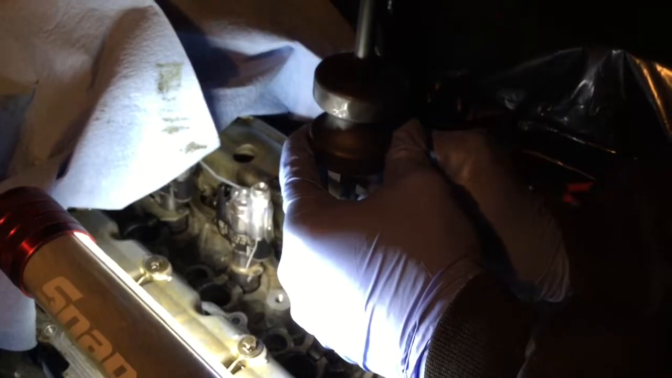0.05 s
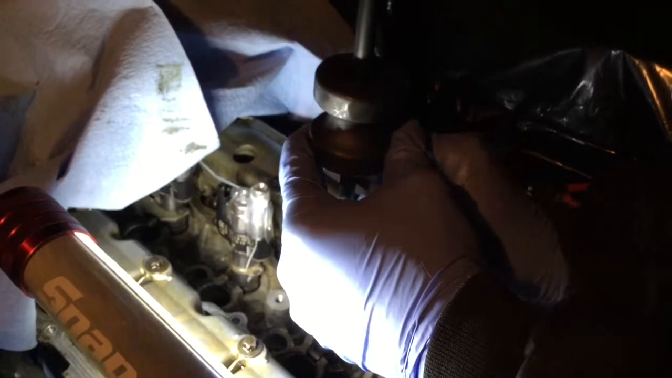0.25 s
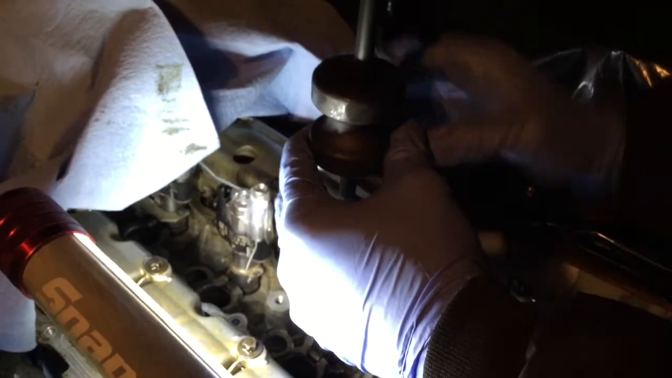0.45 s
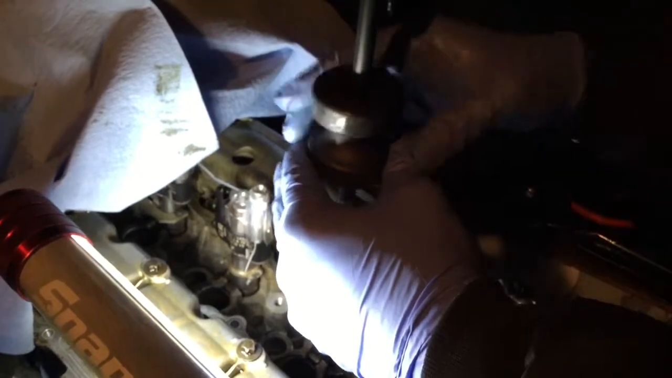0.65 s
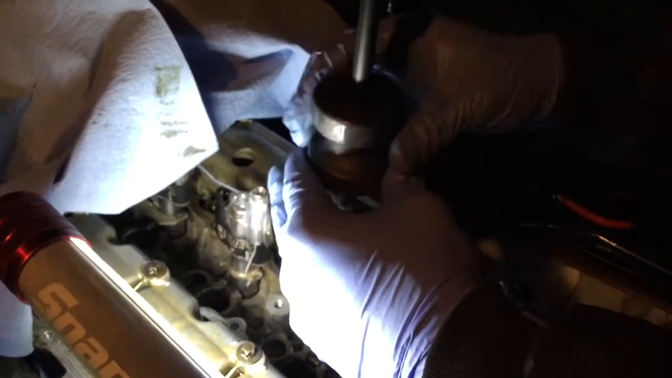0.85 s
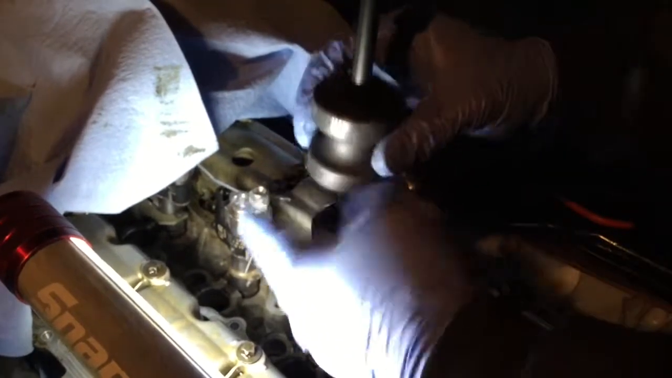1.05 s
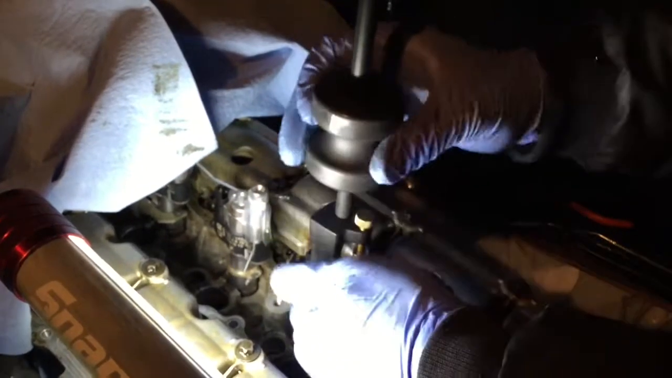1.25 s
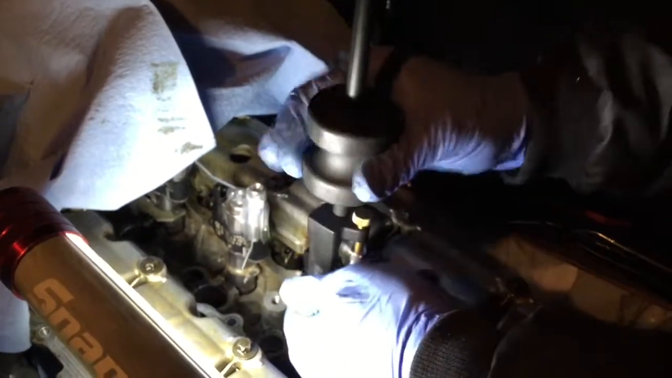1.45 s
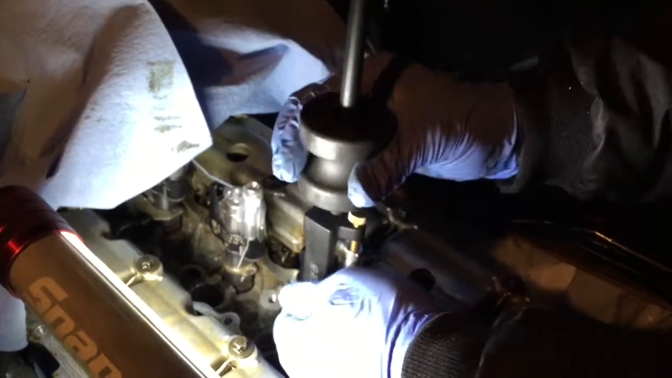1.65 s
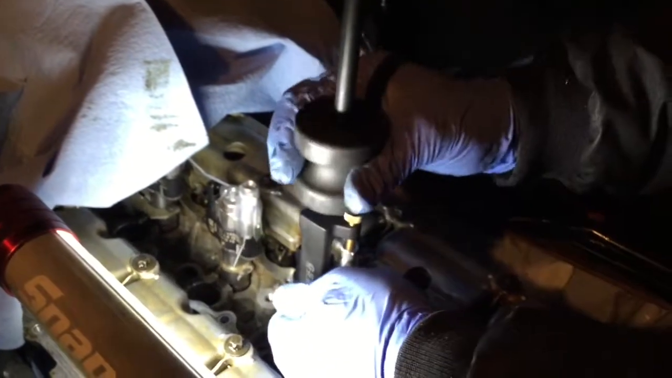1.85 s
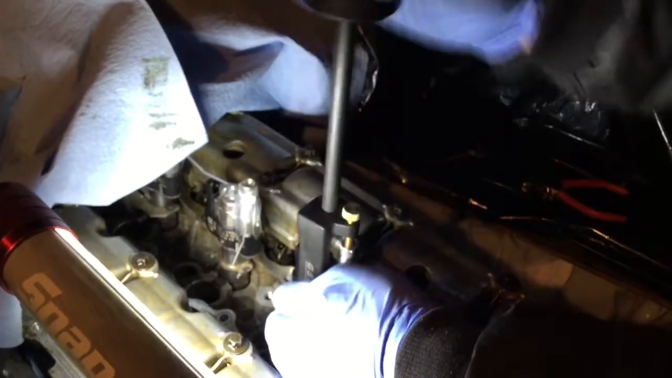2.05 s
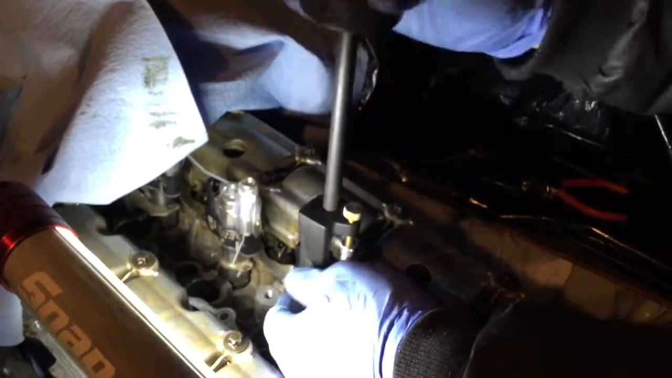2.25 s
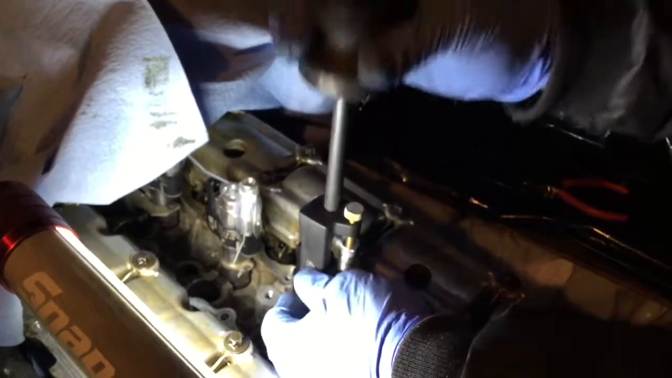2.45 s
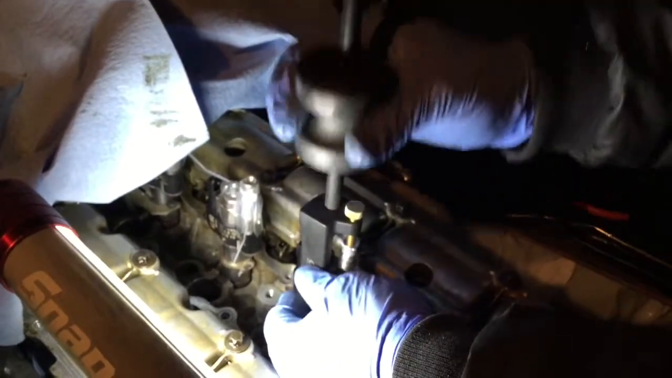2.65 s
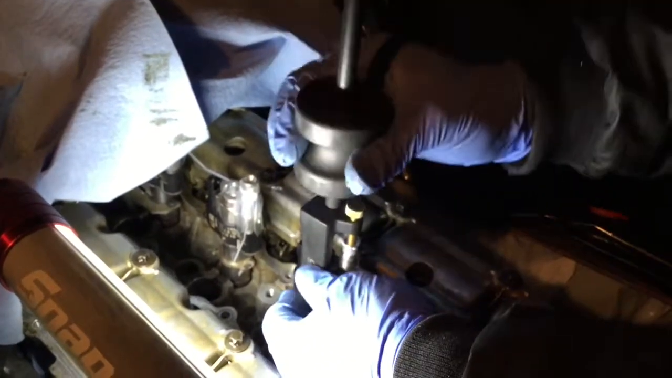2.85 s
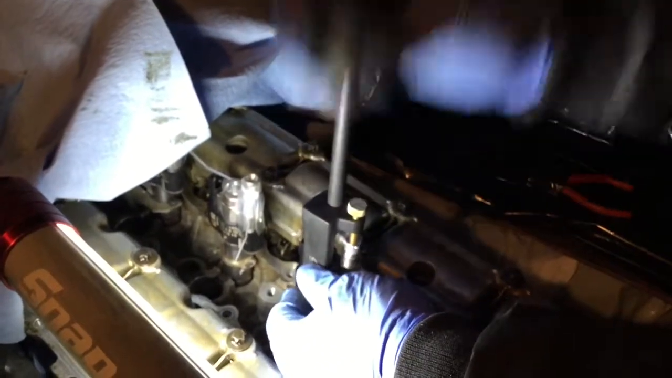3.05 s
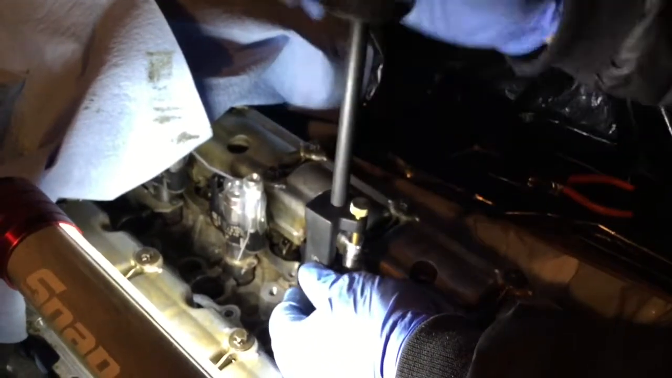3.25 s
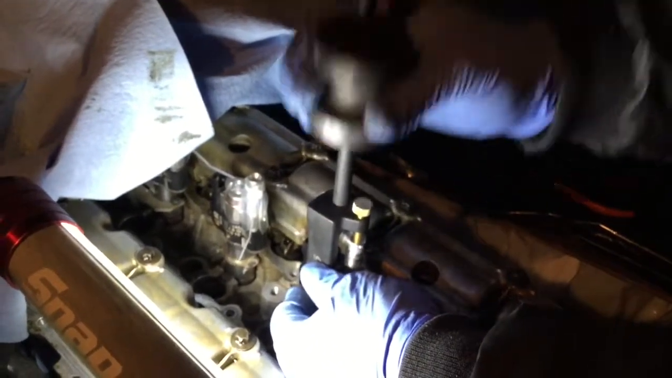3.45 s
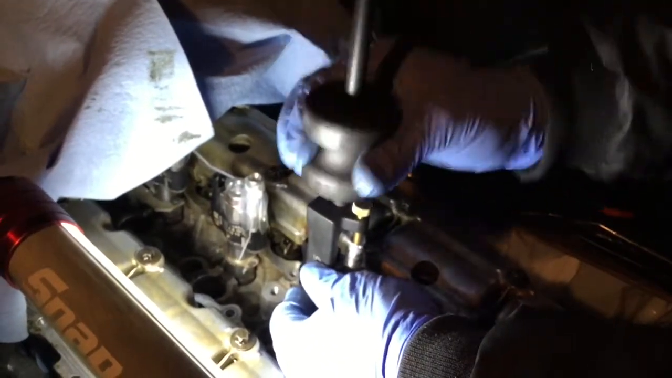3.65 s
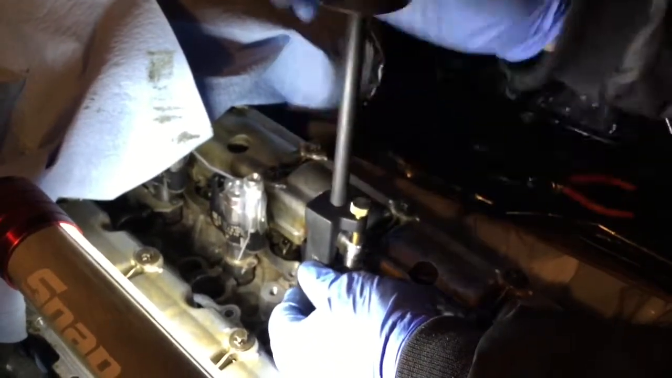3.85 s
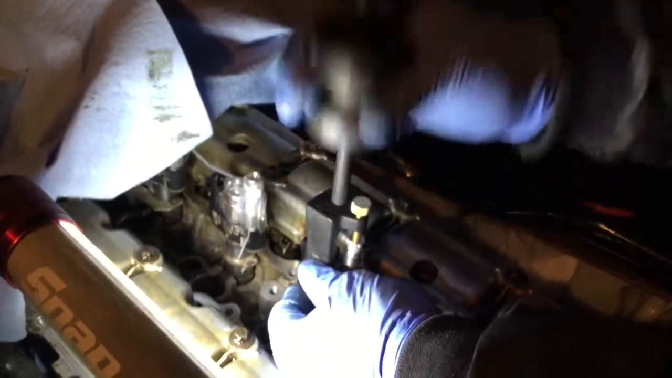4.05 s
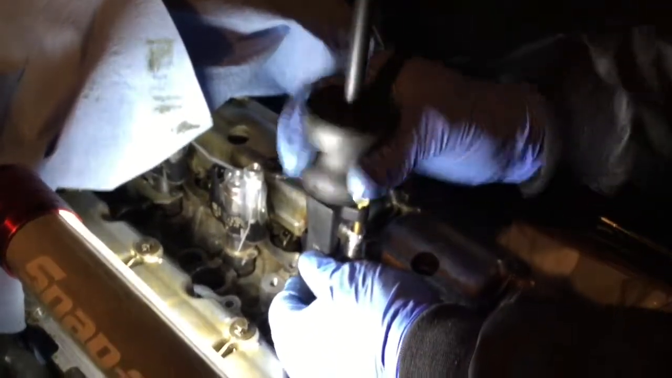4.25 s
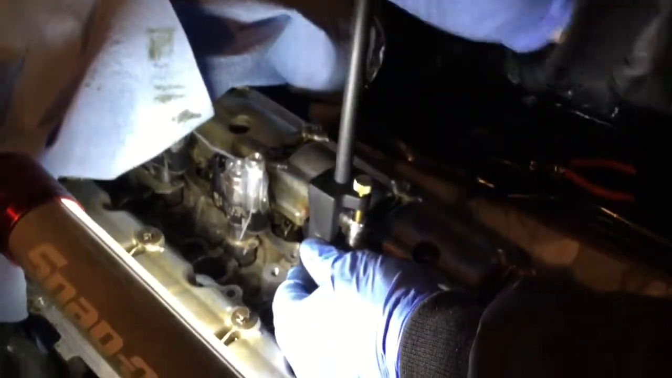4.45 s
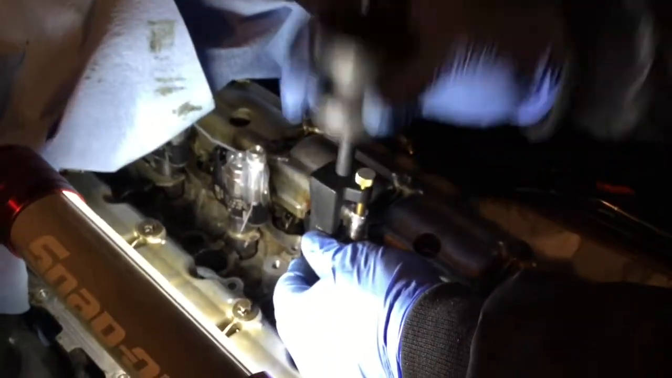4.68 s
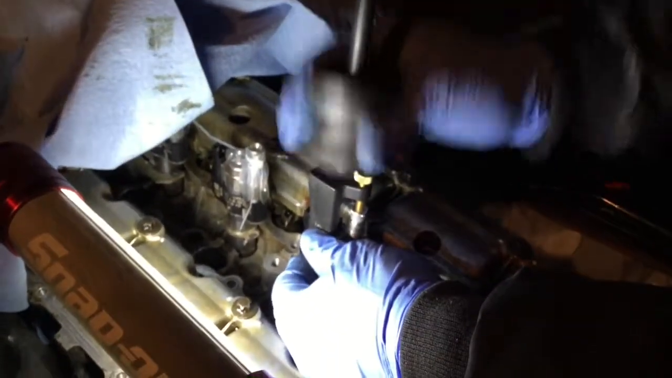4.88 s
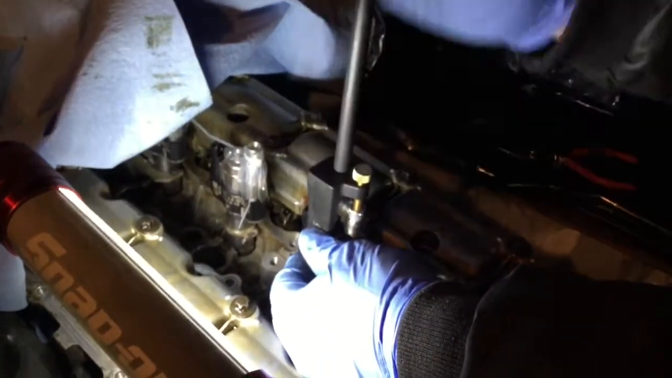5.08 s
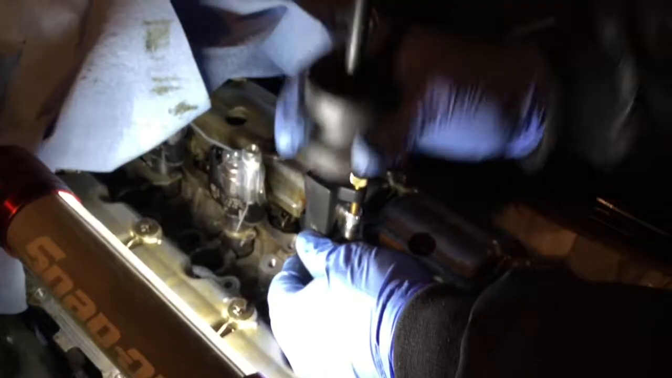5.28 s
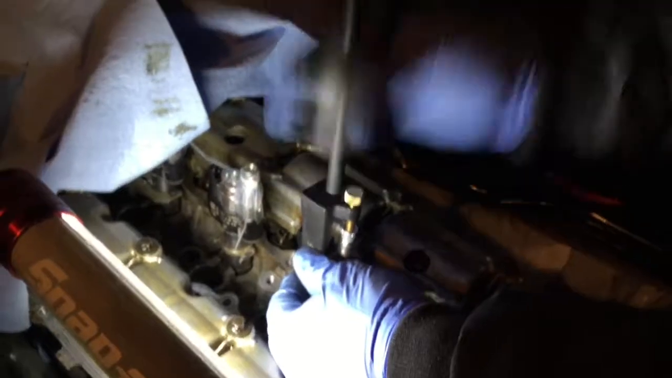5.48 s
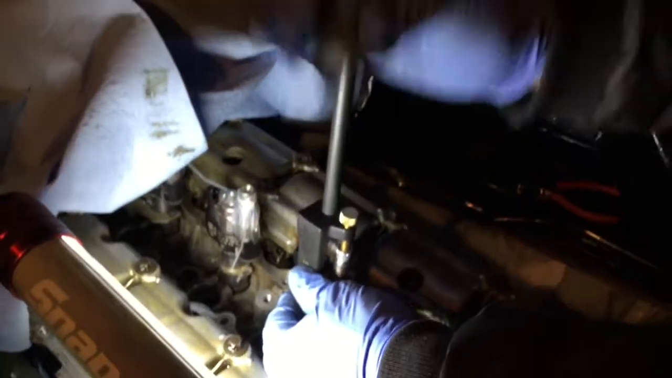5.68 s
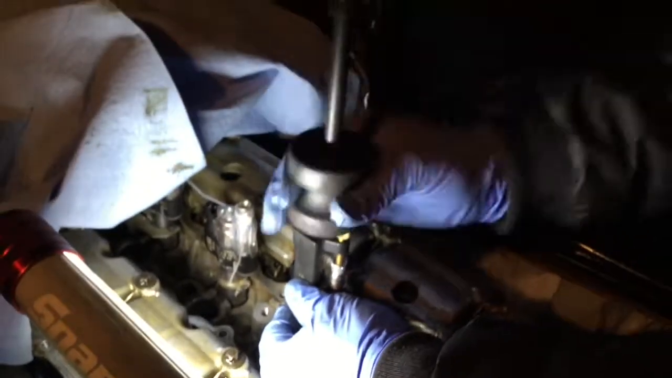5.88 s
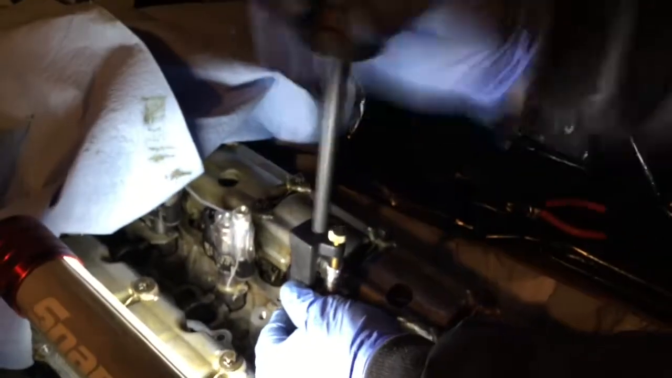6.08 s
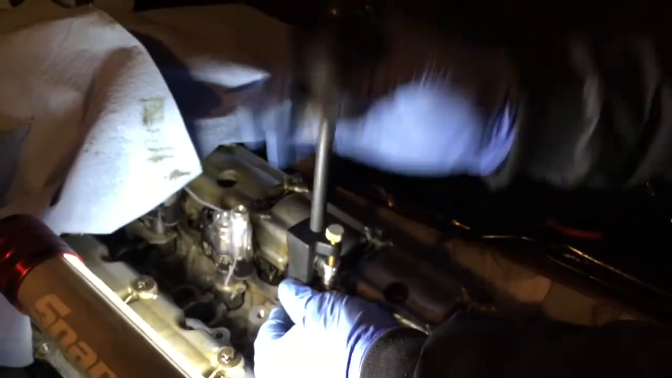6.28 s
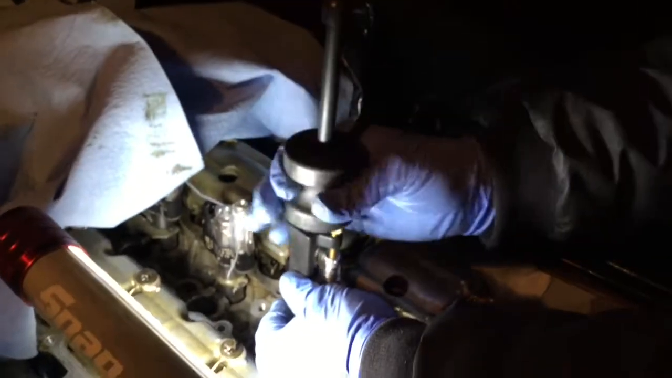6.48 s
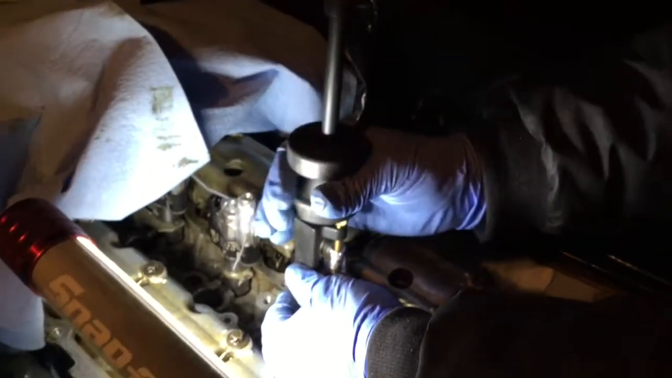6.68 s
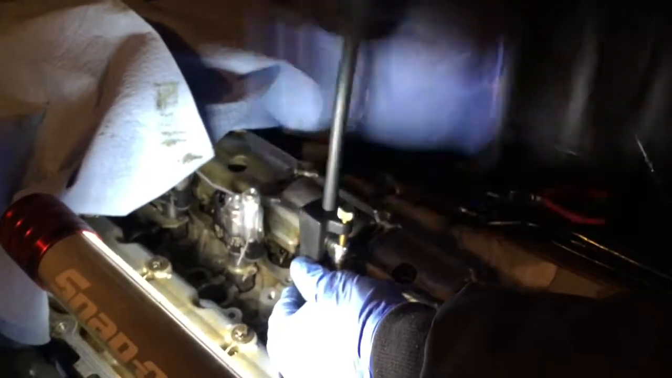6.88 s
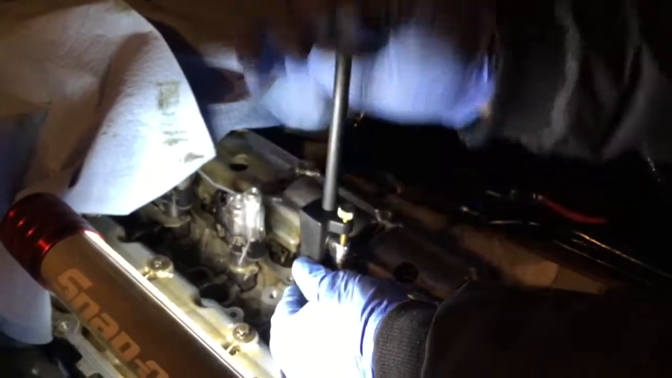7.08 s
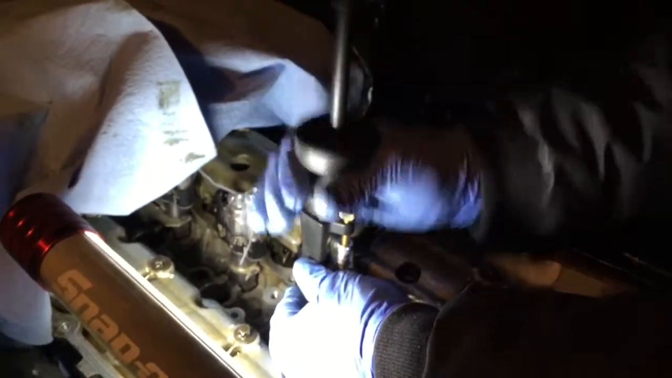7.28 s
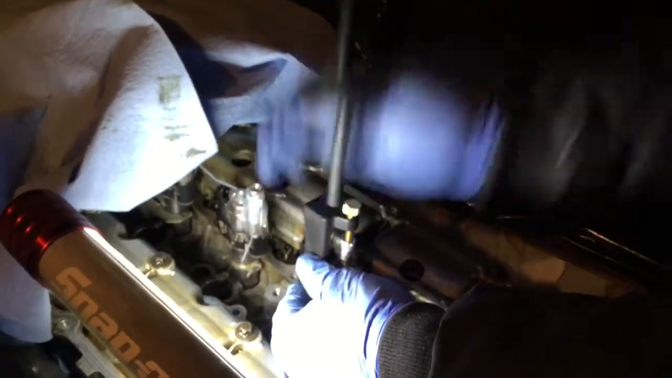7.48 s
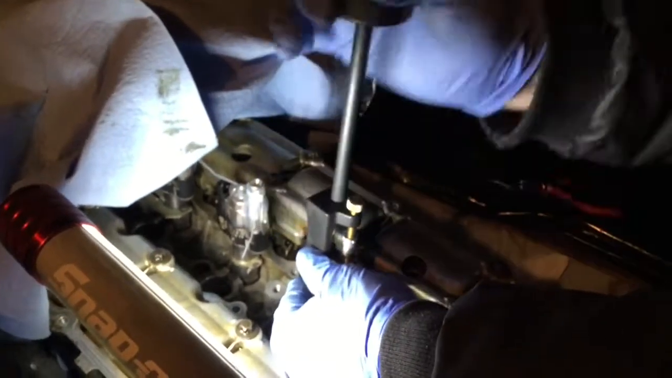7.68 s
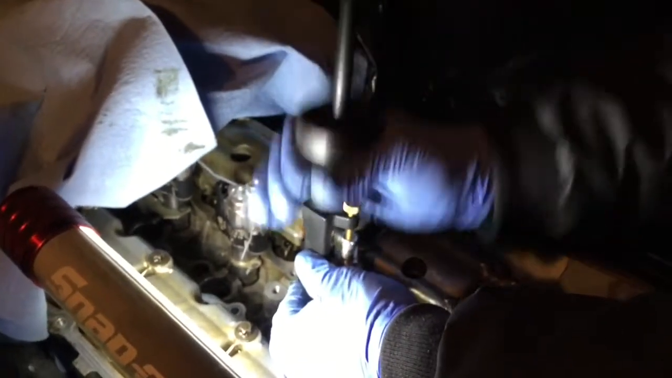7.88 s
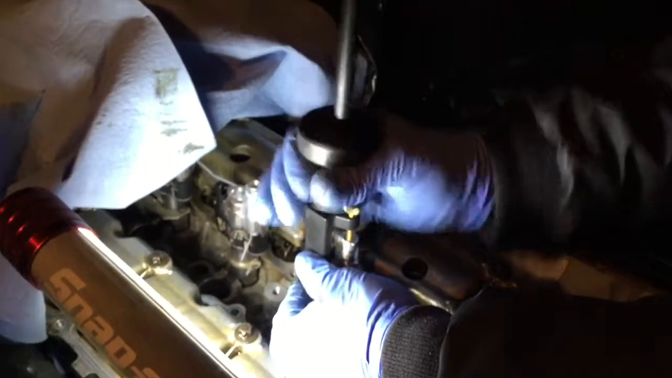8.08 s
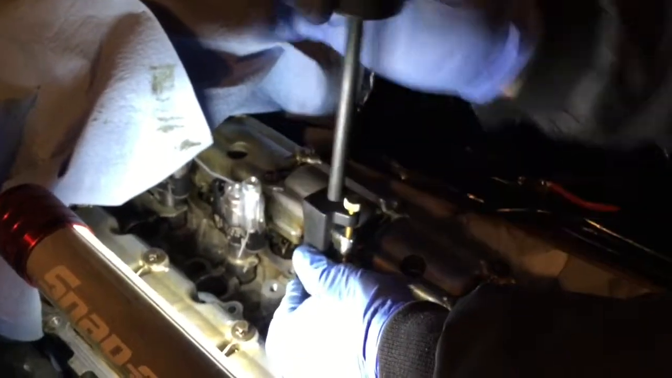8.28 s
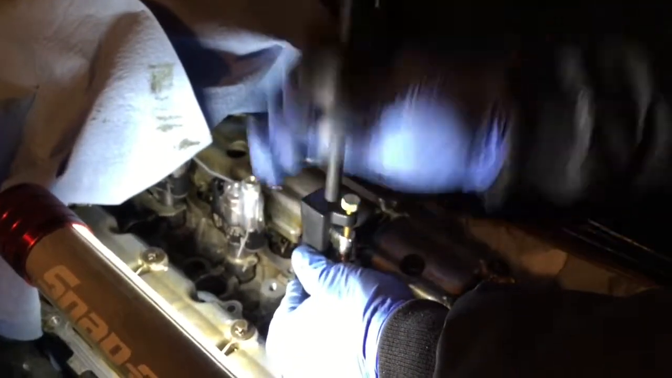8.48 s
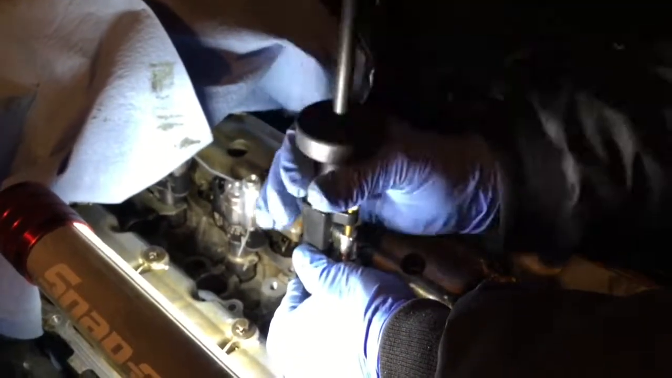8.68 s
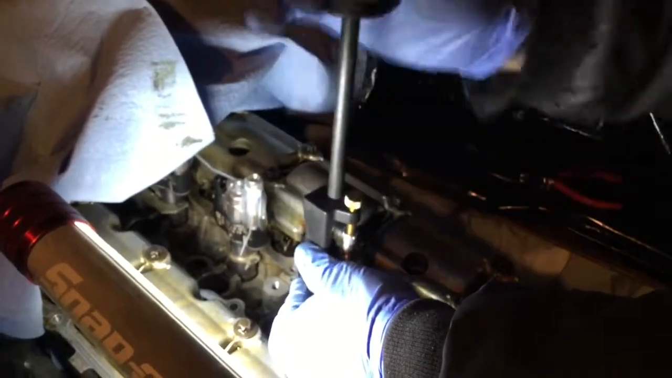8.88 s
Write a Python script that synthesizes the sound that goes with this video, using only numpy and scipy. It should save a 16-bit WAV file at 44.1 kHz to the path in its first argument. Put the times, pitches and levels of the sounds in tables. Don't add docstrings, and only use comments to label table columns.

```python
import sys
import numpy as np
from scipy import signal
from scipy.fft import rfft, irfft
from scipy.io import wavfile
from scipy.ndimage import uniform_filter1d, minimum_filter1d

SR = 44100
rng = np.random.default_rng(int(sys.argv[2]) if len(sys.argv) > 2 else 0)


def convert_level_to_amplitude(level_db):
    exponent = np.asarray(level_db, float) / 20
    return 10 ** exponent


def materialize(psi):
    bounded = np.clip(np.atleast_2d(psi).T, -1, 1)
    quanta = np.round(bounded * 32767).astype(np.int16)
    wavfile.write(sys.argv[1], SR, quanta)


N = 393813

# (frequency [Hz], level [dB])
HISS = [(18, -52.5), (30, -37.5), (55, -25), (141, 1.5), (255, -6), (526, -11.5), (962, -9), (1190, -12.5),
        (1540, -6.5), (3220, -15.5), (7670, -26.5), (12300, -20.5), (16000, -30)]
HISS_DB = -42
# (time [s], level [dB])
RUMBLE = [(0, -48), (.5, -51), (.8, -54), (1.3, -59), (1.6, -57), (2.4, -67), (2.65, -50), (2.9, -70)]
HUM_HZ, HUM_ROUGH_DB = 63.4, -12

# (start [s], end [s], rod line [dB], scrape at the catch [dB], scrape on arrival [dB])
STROKES = [(3.377, 3.794, -53, -53, -58), (4.035, 4.256, -46, -48, -59), (4.299, 4.406, -54, -51, -44),
           (4.651, 4.885, -48.5, -51, -42), (4.954, 5.022, -62, -59, -33.5), (5.185, 5.41, -46.5, -47, -42),
           (5.792, 5.972, -48.5, -49, -53), (6.376, 6.533, -51, -48, -48), (7.156, 7.375, -47.5, -48, -64),
           (7.784, 7.932, -47.5, -45.5, -40), (8.442, 8.632, -49, -46.5, -53)]
CATCH_S, SETTLE_S, ARRIVE_S = 0.021, 0.077, 0.015
QUIET_DB, LINE_SAG_DB, SCRAPE_SAG_DB = -13, -12.5, -6.5
# (frequency [Hz], level [dB])
SCRAPE = [(1500, 0.5), (4000, -8), (7500, -1.5), (10000, -5), (13000, -2), (16000, -14)]
# (start [s], length [s], level [dB], pitch [Hz])
WHISTLES = [(3.397, .05, -55, 7450), (3.478, .045, -57, 7350), (3.53, .02, -61, 8000),
            (3.772, .03, -55, 7600), (3.40, .06, -56, 3950), (4.05, .032, -54, 7300),
            (4.07, .045, -52, 4000), (4.155, .03, -49, 7950), (4.15, .04, -54, 4000),
            (4.215, .04, -52, 3900), (5.195, .04, -54, 7200), (5.212, .024, -53, 7750),
            (5.23, .028, -52, 11500), (5.21, .03, -52, 3900), (5.29, .04, -57, 7500),
            (5.84, .07, -55, 10800), (5.865, .045, -54, 7000), (5.85, .05, -54, 3750),
            (6.373, .06, -52, 3700), (7.165, .035, -54, 6900), (7.19, .045, -52, 3900),
            (7.24, .02, -58, 7000), (7.29, .015, -59, 7000)]
# (time [s], level [dB], squeak [Hz], glide [Hz per ms], fade [ms])
CHAFES = [(3.7748, -25, 3880, 3, 20), (3.808, -12, 8100, 1, 18), (4.0547, -42, 7300, 0, 10),
          (4.0994, -27, 11500, 0, 15), (4.1365, -24, 7500, 4, 10), (4.245, -30, 8030, 2, 30),
          (4.39, -26, 4000, 0, 25), (4.6608, -26, 7400, 2, 25), (4.67, -32, 11500, 0, 18),
          (4.724, -34, 7300, -2, 30), (4.766, -32, 4000, -1, 40), (4.783, -32, 6250, 0, 10),
          (4.86, -24, 8150, 0, 22), (4.865, -30, 11500, 0, 18), (4.9811, -18.5, 8050, 0, 17),
          (5.011, -21, 7200, 0, 8), (5.0169, -12, 8000, 0, 6.4), (5.1966, -22, 3730, -2, 18),
          (5.375, -29, 8160, -5, 45), (5.563, -24, 12500, 0, 12), (5.583, -8, 12100, 110, 4),
          (5.586, -16, 8030, 0, 25), (6.1304, -19, 7960, -1, 23), (6.135, -16, 12000, 82, 8),
          (6.89, -29, 9200, 0, 22), (6.9206, -21, 7800, 0, 14), (6.9351, -10, 11300, 30, 4.4),
          (7.1846, -25, 6880, 0, 8), (7.213, -18.5, 11400, 0, 14), (7.8052, -32, 4030, 0, 18),
          (7.812, -31, 7200, 0, 15), (7.8544, -23, 7960, 0, 8), (7.8755, -24, 3670, -3, 12),
          (7.875, -30, 7100, 0, 8), (7.88, -24, 11000, 40, 20), (7.892, -24, 8050, 0, 14),
          (8.1937, -14, 11900, 30, 8), (8.4674, -24, 3450, 2, 18), (8.615, -30, 8050, 0, 20)]
# (start [s], scrape [dB], squeak [dB], last surge [dB])
RUN_UPS = [(2.03, -42, -46, -25), (3.135, -36, -29, -24), (3.794, -37.5, -35, -18),
           (4.403, -38.5, -41, -19.5), (5.013, -42, -52, -14), (5.565, -39, -50, -18),
           (6.121, -39, -39, -15), (6.914, -35, -39, -17.5), (7.546, -35.5, -31, -18),
           (8.196, -37, -55, -16.5), (8.848, -38.5, -48, -13.5)]
# (frequency [Hz], level [dB])
SURGE = [(60, -23), (200, -2), (900, -7), (2500, -24), (5500, -8.5), (8500, -26)]

# (time [s], crack [dB], thud [dB], clamp ring [dB], thud pitch [Hz])
SLAMS = [(2.0847, -3, -19.5, -51, 195), (3.1576, -2.5, -8, -28, 389), (3.843, 0.5, -2.5, -28, 248),
         (4.4452, -2.5, -21, -4, 327), (5.0514, -1.5, -9, -4, 310), (5.6099, 0, -14, -34, 102),
         (6.1623, 0, -7, -39, 468), (6.9476, 0.5, -1, -40, 185), (7.5765, 1, -6, -37, 330),
         (8.2299, 0, -13, -10, 255), (8.8841, -1, -13, -3.5, 414)]
# (time [s], crack [dB], thud [dB], clamp ring [dB], thud pitch [Hz])
REBOUNDS = [(2.1335, -7, -17, -21, 224), (3.188, -2, -10, -8, 173), (3.869, -0.5, -6, -8, 154),
            (4.4702, -2.5, -7, -14, 342), (5.0738, 0, -2, -9, 416), (5.6286, 2, -8.5, -15, 286),
            (6.1804, 0.5, -6, -15, 113), (6.9656, 2, -7, -15.5, 135), (7.5947, 2, -1, -9, 155),
            (8.2475, 2, -13.5, -11, 215), (8.8997, 2.5, -2.5, -12.5, 204)]
# (time [s], crack [dB], thud [dB], seat ring [dB], clang tail [dB])
LANDINGS = [(4.2617, -18, -17.5, -11, -2), (4.4009, -30.5, -28, -33, -20), (4.8808, -24, -22, -16.5, -13),
            (4.8994, -31.5, -25.5, -26, -15), (5.4211, -21, -22.5, -17, -1.5),
            (5.443, -32.5, -27.5, -28, 2), (5.7892, -33.5, -58, -57, -22), (5.9693, -12.5, -21, -13.5, -2),
            (5.9804, -28, -21, -15, 4), (6.0124, -35, -26, -23, -13), (6.0831, -51, -48, -34, 13),
            (6.3749, -38, -61.5, -50, -20), (6.5375, -21, -18.5, -17, -2), (7.3726, -27.5, -18.5, -15, 1),
            (7.3894, -33, -29, -19, -8), (7.9379, -33.5, -37, -42, 3), (7.9788, -19.5, -14, -46, -15),
            (8.6315, -11.5, -13.5, -12.5, -14)]
# (time [s], crack [dB], thud [dB], clamp ring [dB], clang tail [dB])
BOUNCES = [
    (2.0975, -17, -49, -40, -7),
    (3.169, -17, -33, -29, -1.5),
    (4.4825, -11, -39, -16, -12),
    (6.1885, -12.5, -16, -16, -2),
    (6.5445, -23.5, -26.5, -28.5, -24),
    (7.949, -39, -33, -43, 3),
    (7.984, -20.5, -35, -30, -10.5),
    (8.236, -9.5, -43, -13.5, 4),
    (8.255, -25, -9.5, -31, -21),
    (8.6405, -15, -24, -22, -8.5),
]
TRIALS = 2
TRIAL_TAIL_DB, SLAM_TAIL_DB, REBOUND_TAIL_DB = -12, -8.5, -11.5
LANDING_HZ, BOUNCE_HZ = 201, 231

# (contact [ms], brightness [dB per octave], rod middle [dB], extra ring fade [dB/s])
SLAM_FACES = [(2.9, 1.5, 3.5, 0), (5, 1, 1.5, 0), (2.7, 1, -1.5, 0), (5.5, 0, 5, 0), (5, 0, 2.5, 0),
              (5.1, -0.5, 0, 0), (4.1, -0.5, 1, 0), (4, 0, 1, 0), (5.44, 0.5, -1, 0), (4, 0.5, 3.5, 0),
              (3.9, 1, 2, 0)]
REBOUND_FACES = [(2.7, 0, 0, -32), (2.2, 0, 0, 7), (2.5, 0, 0, 1), (2.4, 0, 0, 60), (3, 0, 0, 30),
                 (3.4, 0, 0, 5), (5.5, 0, 0, 5), (3.4, 0, 0, 5), (4.1, 0, 0, 5), (4, 0, 0, 5),
                 (5.5, 0, 0, 5)]
LANDING_FACES = [(2.7, 0, 1, 54), (3, 0, -3, 60), (4, 0, 1, 54), (3.2, 0, 0, 60), (2.3, 0.51, -1, 60),
                 (3, 0.13, 0, 60), (2.2, 1.5, 4, 60), (3, 0, 1.5, 60), (3, 0, 1, 47), (3, 0, 1, 60),
                 (3, 0, -3, 60), (3.7, 0, 10.5, 60), (3, 0, 0, 60), (3.5, 0, 0.5, 120), (3, 0, 2, 60),
                 (3, 0, 1.5, 60), (2.9, 0, 1, 60), (3.1, 1.3, -3, 130)]

# (frequency [Hz], level [dB])
TRIAL_COLOUR = [(180, -14), (300, -1), (1890, -8), (2720, -27), (4070, -10), (7180, -12), (7810, -3.5),
                (10000, -14), (12100, -2), (14000, -8), (16300, -28)]
SLAM_COLOUR = [(180, -27), (300, 4), (967, 2.5), (3740, -6), (4890, -7), (7300, -5), (8070, 0),
               (10500, -6.5), (12900, 3.5), (15500, -14), (16300, -14)]
REBOUND_COLOUR = [(180, -46), (300, 0.5), (804, 5.5), (2300, 0), (3440, -4), (4000, -0.5), (6610, -7),
                  (8630, -1), (13600, -1.5), (15200, -3), (16300, -33)]
LANDING_COLOUR = [(180, -30), (300, -23), (935, 10.5), (1400, -3), (1890, 7), (6180, 0), (9700, 0),
                  (15200, -10), (16300, -18)]
# (frequency [Hz], level [dB])
CLANG_COLOUR = [(180, -7.5), (300, -2), (566, -11), (752, 1), (1100, -10), (2340, -8.5), (2910, -11),
                (7060, -13.5), (10900, -7), (13800, -6.5), (16300, -19)]
# (frequency [Hz], time [s])
CLANG_T60 = [(300, 0.23), (1500, 0.17), (4000, 0.18), (8000, 0.21), (16000, 0.16)]

# (frequency [Hz], level [dB], time to die by 60 dB [s])
ENGINE = [(65, -3.5, 0.059), (135, -4, 0.06), (203.8, -7, 0.12), (310, -1, 0.05), (513, -0.5, 0.044),
          (608, -2, 0.034)]
CLAMP = [(739, -6.5, 0.29), (620, 1.5, 0.036), (718, 3, 0.088), (780, -11, 0.08), (830, -6, 0.16),
         (578, -10, 0.12), (862, -1, 0.059), (1030, -9, 0.022)]
SEAT = [(730, -3.5, 0.18), (288, -5.5, 0.15), (491, -4, 0.13), (568, -9, 0.048), (787, -9, 0.09),
        (838, -0.5, 0.15), (1035, 1.5, 0.076), (1225, -5.5, 0.14)]
ROD = [(1224, 7.5, 0.017), (1690, -2, 0.042), (1833, 2, 0.029), (2430, 9, 0.013), (3065, -7, 0.015),
       (3152, 1.5, 0.031), (3790, -4, 0.034), (4250, -6, 0.045), (5056, -1, 0.031), (6220, -11, 0.068),
       (7920, 4, 0.033), (9200, 2, 0.037), (12100, 7, 0.013), (12950, -2, 0.02)]
SHAFT = [(8030, -7.5, 0.035), (8040, -24, 0.09), (4080, -17, 0.028), (6790, -12.5, 0.018),
         (9200, -5.5, 0.02), (11500, -8, .015), (13300, -6, .015)]
CHATTER_DB = 3.0
FIRST_BITE_DB, BITE_MS = 3.5, 1.7
RING_RATTLE_DB = 2.5


def evened(x):
    return x / np.sqrt(np.mean(x ** 2) + 1e-20)


def read(points, hz):
    f, value = np.transpose(points)
    return np.interp(np.log(hz + 1), np.log(f + 1), value)


def add(mix, s, sound):
    part = mix[round(s * SR):][:len(sound)]
    part += sound[:len(part)]


def coloured(x, points):
    gain = convert_level_to_amplitude(read(points, np.fft.rfftfreq(len(x), 1 / SR)))
    return irfft(rfft(x) * gain, len(x))


def blotches(shape, across, along):
    patches = uniform_filter1d(rng.standard_normal(shape), size=across, axis=0)
    return evened(uniform_filter1d(patches, size=along, axis=1))


def garage():
    frames = N // 256 + 5
    hz = np.fft.rfftfreq(1024, 1 / SR)
    real, imaginary = rng.standard_normal((2, 513, frames))
    patches = blotches((513, frames), across=14, along=16)
    flicker = evened(uniform_filter1d(rng.standard_normal(frames), 6))
    level_db = read(HISS, hz)[:, None] + 0.65 * patches + 1.0 * flicker
    z = (real + 1j * imaginary) * convert_level_to_amplitude(level_db)
    hiss = convert_level_to_amplitude(HISS_DB) * evened(signal.istft(z, nperseg=1024, noverlap=768)[1][:N])

    low = coloured(rng.standard_normal(N + N % 2), [(35, -22), (55, -2), (72, 17.0), (110, -45)])[:N]
    steps = np.repeat(rng.standard_normal((2, frames)), 256, axis=1)[:, :N]
    waver = evened(uniform_filter1d(steps, size=5000, axis=1, mode="wrap"))
    phase = 2 * np.pi * np.cumsum(HUM_HZ + 1.3 * waver[1]) / SR
    hum = np.sqrt(2) * convert_level_to_amplitude(1.8 * waver[0]) * np.sin(phase)
    s, db = np.transpose(RUMBLE)
    rumble_level = convert_level_to_amplitude(np.interp(np.arange(N) / SR, s, db))
    return hiss + rumble_level * (hum + convert_level_to_amplitude(HUM_ROUGH_DB) * evened(low))


def flecked(x, patchy_db):
    z = signal.stft(x, SR, nperseg=256)[2]
    flare_db = np.minimum(patchy_db * blotches(z.shape, across=3, along=3), 9)
    return evened(signal.istft(z * convert_level_to_amplitude(flare_db), SR, nperseg=256)[1][:len(x)])


def fuzzy(hz, size, smooth):
    noise = rng.standard_normal(size) + 1j * rng.standard_normal(size)
    fuzz = uniform_filter1d(noise, round(smooth))
    phase = 2 * np.pi * np.cumsum(hz * np.ones(size)) / SR
    return evened((fuzz * np.exp(1j * phase)).real)


def strokes():
    out = np.zeros(N)
    for s, end, line_db, catch_db, arrive_db in STROKES:
        t = np.arange(2 * round((end - s) * SR / 2)) / SR
        rise_db = QUIET_DB * np.maximum(1 - t / CATCH_S, 0)
        glide = 1 - np.exp(-np.maximum(t - CATCH_S, 0) / SETTLE_S)
        effort = convert_level_to_amplitude(catch_db + rise_db + SCRAPE_SAG_DB * glide)
        effort += convert_level_to_amplitude(arrive_db) * np.exp((t - t[-1]) / ARRIVE_S)
        grit = convert_level_to_amplitude(1.8 * evened(uniform_filter1d(rng.standard_normal(len(t)), 200)))
        sung = 0.17 * fuzzy(7350, len(t), smooth=61) * grit
        sung += 0.36 * fuzzy(10000, len(t), smooth=150)
        rasp = flecked(coloured(rng.standard_normal(len(t)), SCRAPE), patchy_db=4.5)
        scrape = (rasp + sung) * grit * effort
        line_level = convert_level_to_amplitude(line_db + rise_db + LINE_SAG_DB * glide)
        line = fuzzy(3950, len(t), smooth=120) * grit * line_level
        add(out, s, (scrape + line) * signal.windows.tukey(len(t), .15))
    return out


def whistles():
    out = np.zeros(N)
    for s, length, db, hz in WHISTLES:
        size = min(round(length * SR), 4096)
        swell = signal.windows.tukey(size, .5)
        add(out, s, convert_level_to_amplitude(db) * fuzzy(hz, 4096, smooth=260)[:size] * swell)
    return out


def chafes():
    out, ms = np.zeros(N), np.arange(4096) / SR * 1000
    for s, db, hz, glide, fade_ms in CHAFES:
        squeak = fuzzy(np.minimum(hz + glide * ms, 15000), len(ms), smooth=150)
        shape = np.minimum(ms / 2.9, 1) * np.exp(-ms / max(fade_ms, 1))
        add(out, s, convert_level_to_amplitude(db - 18.0) * squeak * shape)
    return out


def run_ups():
    out = np.zeros(N)
    for (s, scrape_db, squeak_db, surge_db), (end, *_) in zip(RUN_UPS, SLAMS):
        size = round((end - s + 0.0022) * SR)
        t = np.arange(size) / SR
        noise = rng.standard_normal((3, size + size % 2))
        grit = convert_level_to_amplitude(4.2 * evened(uniform_filter1d(noise[2], 120)))[:size]
        rasp = flecked(coloured(noise[0], SCRAPE), patchy_db=14.0)[:size]
        scrape = convert_level_to_amplitude(scrape_db) * rasp * grit
        scrape += convert_level_to_amplitude(scrape_db - 2) * fuzzy(9500 + 4500 * t / t[-1], size, smooth=21)
        squeak = convert_level_to_amplitude(squeak_db) * fuzzy(8090, size, smooth=280)
        surge = convert_level_to_amplitude(surge_db) * evened(coloured(noise[1], SURGE))[:size]
        surge = surge * np.exp((t - t[-1]) / 0.0054)
        growth = np.minimum(t / 0.013, 1) * convert_level_to_amplitude(-4.0 * (1 - t / t[-1]))
        add(out, s, (scrape + squeak) * growth + surge)
    return out


def rung(modes, t, chance, spread_db, detune):
    hz, db, t60 = np.transpose(modes)[:, :, None]
    share, tuning = chance[:2 * len(modes)].reshape(2, -1, 1)
    waves = np.sin(2 * np.pi * hz * (1 + detune * tuning) * t) * np.sign(tuning)
    return (convert_level_to_amplitude(db + spread_db * share - 60 * t / t60) * waves).sum(0)


def clang(noise):
    hz, t, z = signal.stft(coloured(noise, CLANG_COLOUR), SR, nperseg=256)
    clumps_db = 4.2 * blotches(z.shape, across=2, along=5)
    fade_db = -60 * t / read(CLANG_T60, hz)[:, None]
    tail = signal.istft(z * convert_level_to_amplitude(clumps_db + fade_db), SR, nperseg=256)[1][:len(noise)]
    return tail / np.std(tail[:400])


def heavy(rows, tail_db):
    return [(*row, tail_db) for row in rows]


def light(rows, thud_hz):
    return [(*row[:-1], thud_hz, row[-1]) for row in rows]


def blows(rows, faces, colour, holder, bar, rise_ms, damping, ring_damping, rod_db, sag,
          push_ms, body_db, ring_db):
    out, t = np.zeros(N), np.arange(10240) / SR
    octaves = np.log2((np.fft.rfftfreq(len(t), 1 / SR) + 100) / 4000)
    for row, (contact_ms, tilt_db, middle_db, fade_db) in zip(rows, faces):
        s, crack_db, thud_db, holder_db, thud_hz, tail_db = row
        noise, chance = rng.standard_normal((4, len(t))), rng.standard_normal((3, 32))

        past = np.maximum(t - contact_ms / 1000, 0)
        bite = convert_level_to_amplitude(FIRST_BITE_DB * np.exp(-t * 1000 / BITE_MS) - 2.0)
        shape = np.minimum(t * 1000 / rise_ms, 1) * np.exp(-past / 0.0029) * bite
        uneven = convert_level_to_amplitude(CHATTER_DB * evened(uniform_filter1d(noise[1], 40)))
        lumps = convert_level_to_amplitude(2.4 * evened(uniform_filter1d(noise[3][:len(t) // 2 + 1], 160)))
        crack = evened(irfft(rfft(coloured(noise[0], colour)) * lumps)) * shape * uneven

        kick = noise[1][:round(contact_ms * SR / 1000) + 1]
        rod = rung(bar, t, chance[0], spread_db=4.0, detune=0.0014)
        rod = signal.oaconvolve(rod, kick / np.linalg.norm(kick))[:len(t)]

        rattle = convert_level_to_amplitude(0.72 * evened(uniform_filter1d(noise[3], 130)))
        tail = convert_level_to_amplitude(tail_db - damping * t) * clang(noise[2]) * rattle * np.minimum(t / 0.0019, 1)

        sagging_hz = thud_hz * np.exp(sag * (.4 - np.minimum(t / 0.013, 1.6)))
        push = np.sin(2 * np.pi * np.cumsum(sagging_hz) / SR) * np.exp(-t * 1000 / push_ms)
        body = convert_level_to_amplitude(body_db) * rung(ENGINE, t, chance[1], spread_db=2.7, detune=0.058)
        thud = (push + body) * np.minimum(t / 0.0027, 1)

        ring = rung(holder, t, chance[2], spread_db=2.2, detune=.004)
        ring = ring * np.minimum(t / 0.0015, 1) * convert_level_to_amplitude(-(ring_damping + fade_db) * t)
        ring = ring * convert_level_to_amplitude(RING_RATTLE_DB * evened(uniform_filter1d(noise[3], size=260)))

        facing = convert_level_to_amplitude(crack_db - 3.5 + tilt_db * octaves + middle_db * np.exp(-octaves ** 2))
        bright = irfft(rfft(crack + convert_level_to_amplitude(rod_db) * rod + tail) * facing)
        low = convert_level_to_amplitude(thud_db + 3.0) * thud + convert_level_to_amplitude(holder_db + ring_db) * ring
        add(out, s + 0.00066, bright + low)
    return out


def scene():
    mix = garage() + strokes() + whistles() + chafes() + run_ups()
    mix += blows(light(BOUNCES, BOUNCE_HZ), [(2.2, 0, 0, 0)] * len(BOUNCES), SLAM_COLOUR, CLAMP, SHAFT,
                 rise_ms=0.4, damping=56, ring_damping=13, rod_db=3, sag=0.074,
                 push_ms=5.8, body_db=-8.5, ring_db=-3.5)
    mix += blows(light(LANDINGS, LANDING_HZ), LANDING_FACES, LANDING_COLOUR, SEAT, SHAFT,
                 rise_ms=0.41, damping=370, ring_damping=20, rod_db=3.5, sag=0.075,
                 push_ms=6.4, body_db=-18.0, ring_db=-13.5)
    mix += blows(heavy(REBOUNDS, REBOUND_TAIL_DB), REBOUND_FACES, REBOUND_COLOUR, CLAMP, ROD,
                 rise_ms=0.34, damping=8.5, ring_damping=16, rod_db=-12.0, sag=0.081,
                 push_ms=5.8, body_db=-5.5, ring_db=-4.5)
    mix += blows(heavy(SLAMS[:TRIALS], TRIAL_TAIL_DB), SLAM_FACES[:TRIALS], TRIAL_COLOUR, CLAMP, ROD,
                 rise_ms=0.72, damping=83, ring_damping=680, rod_db=-19.0, sag=1.44,
                 push_ms=8.8, body_db=-9.5, ring_db=-18)
    mix += blows(heavy(SLAMS[TRIALS:], SLAM_TAIL_DB), SLAM_FACES[TRIALS:], SLAM_COLOUR, CLAMP, ROD,
                 rise_ms=0.62, damping=37, ring_damping=1050, rod_db=-15.0, sag=0.42,
                 push_ms=5.0, body_db=-8.5, ring_db=-6.5)
    return mix[None]


def thinned(x, above_hz, floor_db):
    hz, t, z = signal.stft(x, SR, nperseg=1024)
    band = np.arange(len(hz)) // 12
    starts = np.flatnonzero(np.diff(band, prepend=-1))
    power = np.add.reduceat(abs(z) ** 2, starts, axis=1)[:, band]
    kept = (10 * np.log10(power + 1e-20) > floor_db) | (hz < above_hz)[:, None]
    top = np.where(hz > 15900, .04, 1)[:, None]
    return signal.istft(z * kept * top, SR, nperseg=1024)[1][:, :N]


def low_pass(x):
    return signal.sosfilt(signal.butter(12, 16440, fs=SR, output="sos"), x)


def record(dry):
    power_db = 10 * np.log10(abs(uniform_filter1d(dry[0] ** 2, 400)) + 1e-12)
    over_db = np.clip(power_db + 17.0, 0, 12)
    hold = round(.19 * SR)
    held_db = -minimum_filter1d(np.r_[np.zeros(hold // 2), -over_db], hold)[:N]
    lag = np.exp(-1 / (0.012 * SR))
    dip_db = signal.lfilter([1 - lag], [1, -lag], 0.33 * held_db)
    capsule = signal.butter(2, 48, "high", fs=SR, output="sos")
    ducked = signal.sosfilt(capsule, dry / convert_level_to_amplitude(dip_db))
    clipped = np.clip(ducked, -.8, .8)
    capacitor = signal.butter(2, 42, "high", fs=SR, output="sos")
    clipped = signal.sosfilt(capacitor, clipped)
    finished = thinned(clipped, above_hz=13900, floor_db=-71)
    return low_pass(finished)


dry = scene()
out = record(dry)
materialize(out)
```